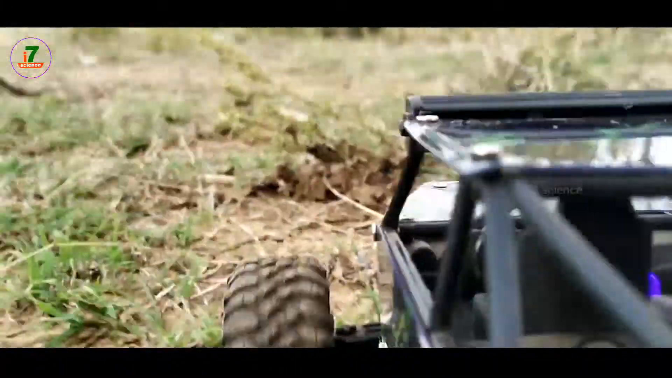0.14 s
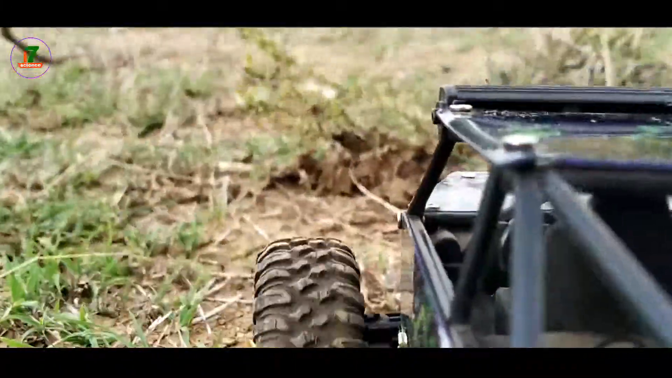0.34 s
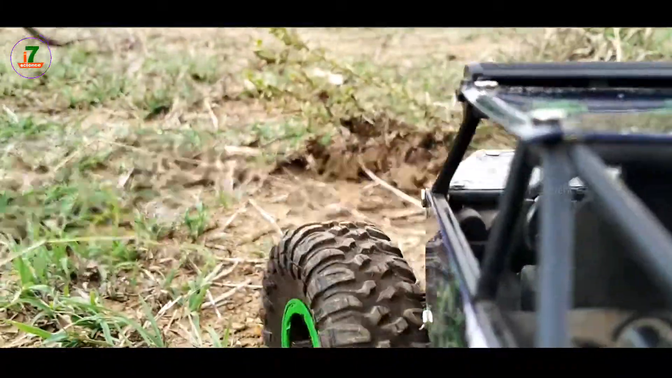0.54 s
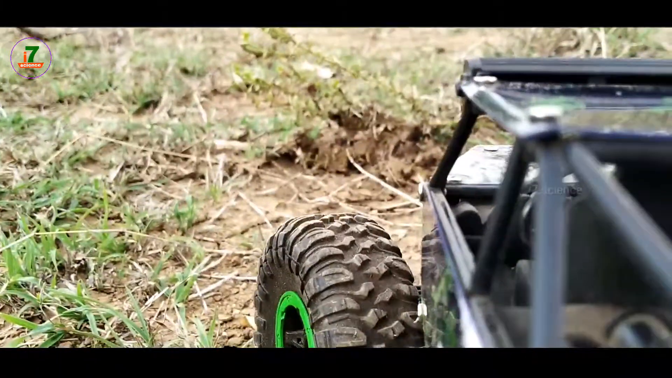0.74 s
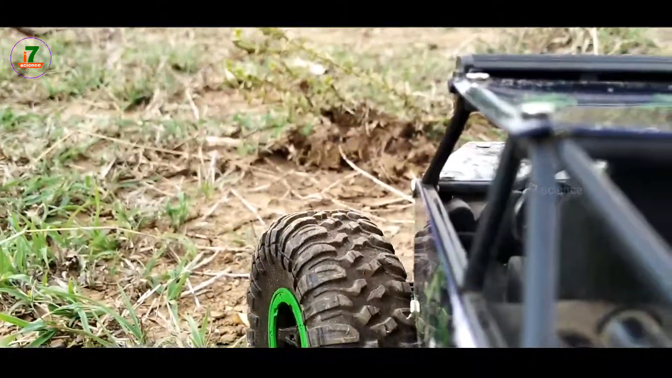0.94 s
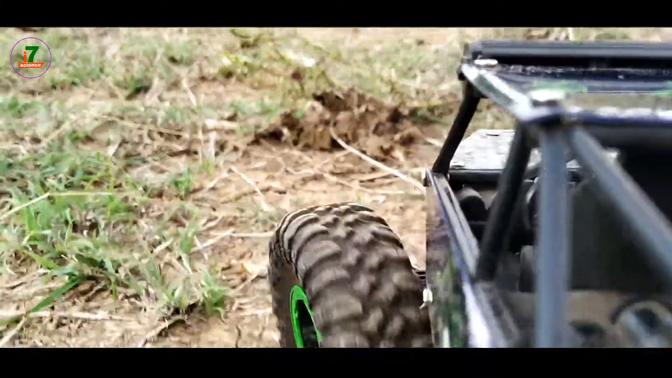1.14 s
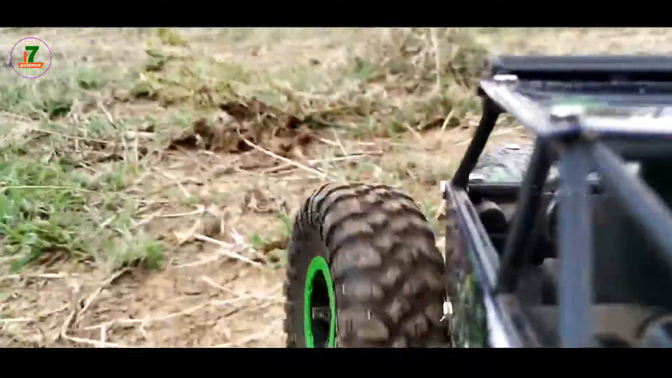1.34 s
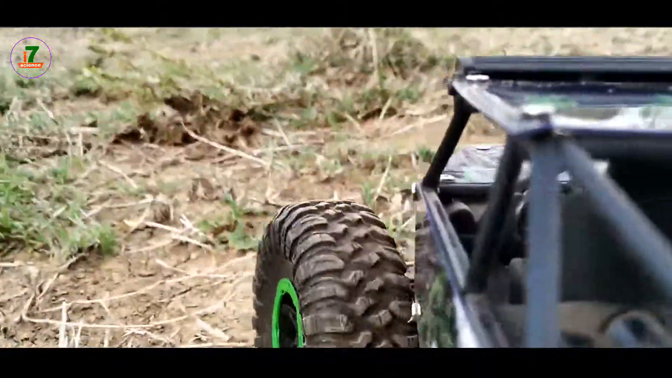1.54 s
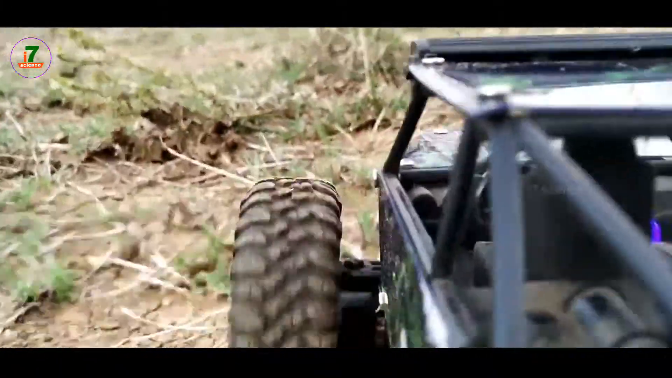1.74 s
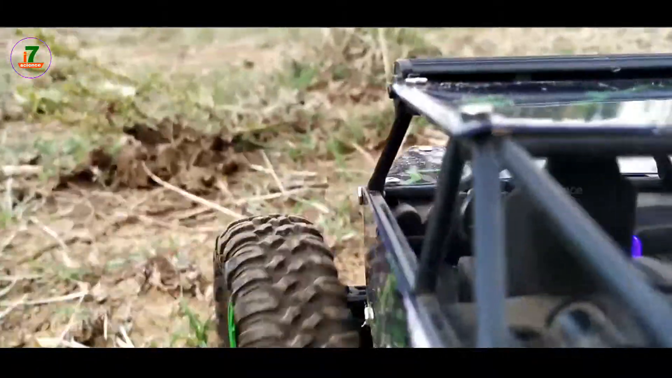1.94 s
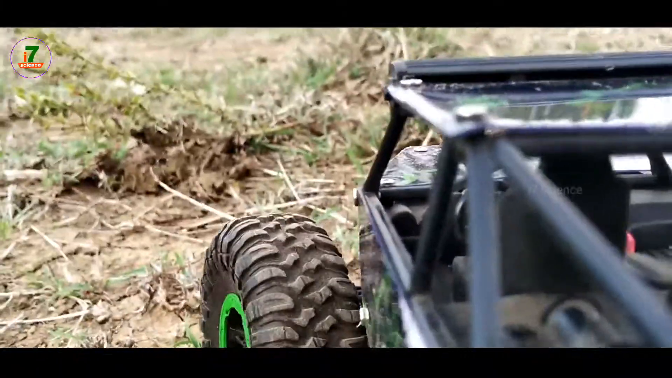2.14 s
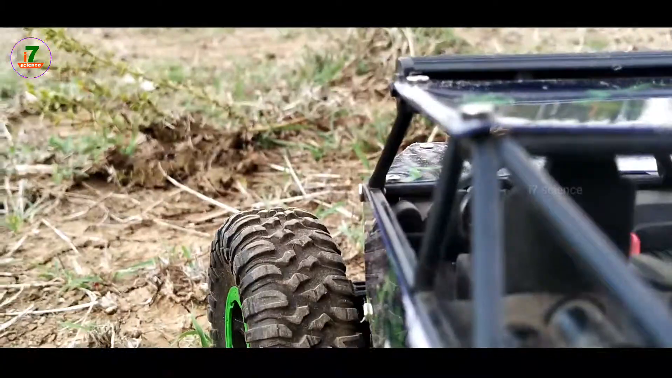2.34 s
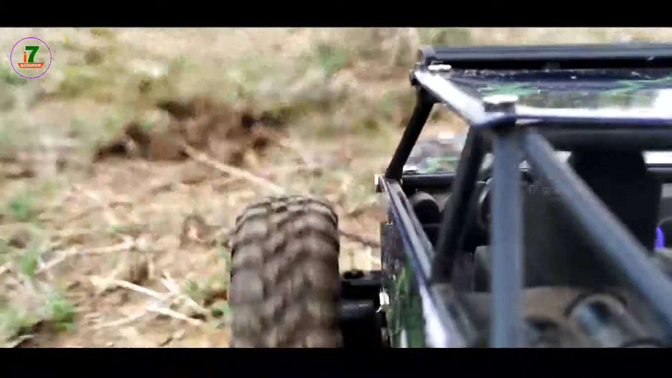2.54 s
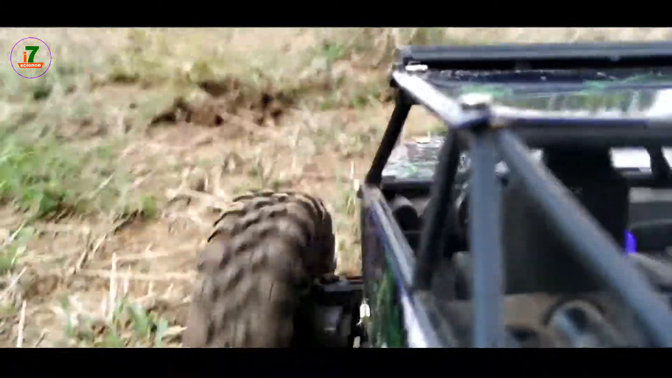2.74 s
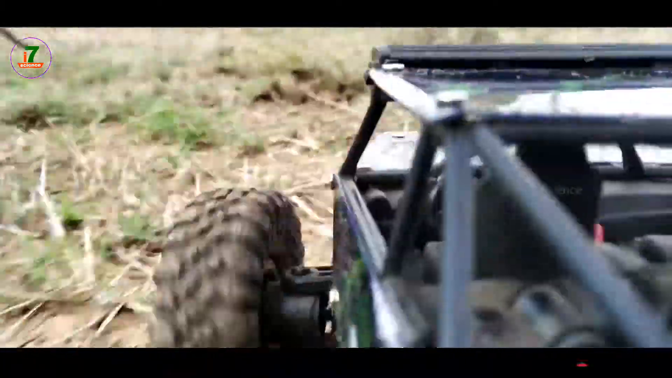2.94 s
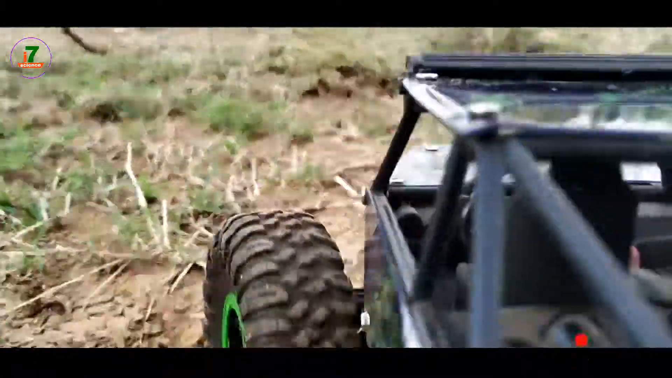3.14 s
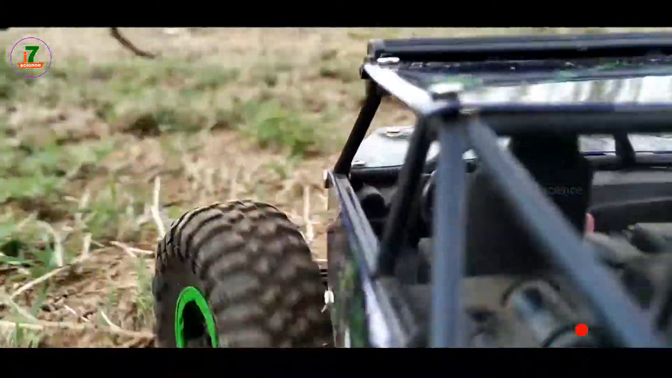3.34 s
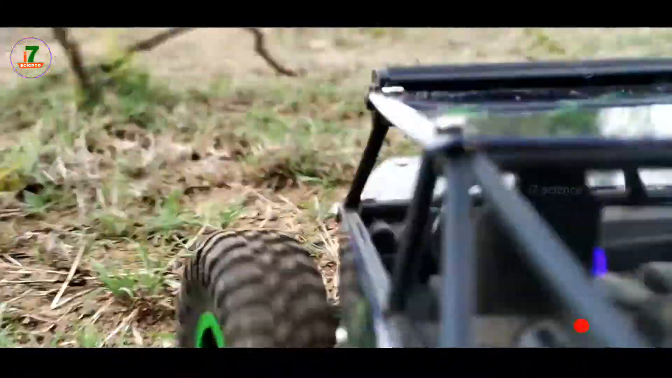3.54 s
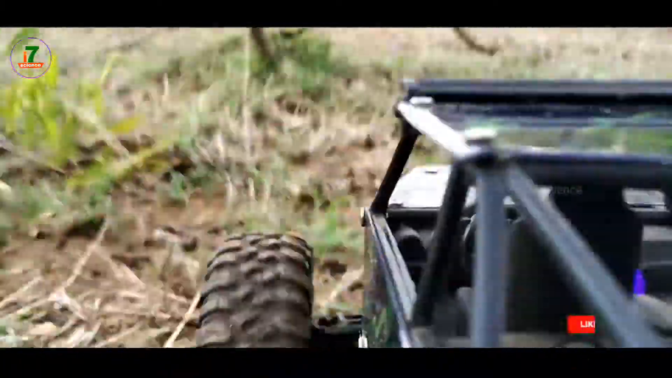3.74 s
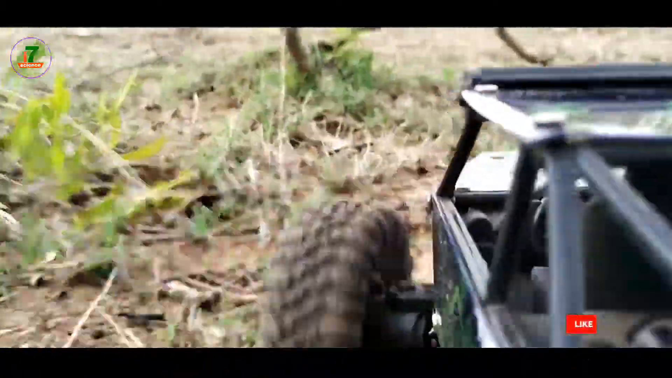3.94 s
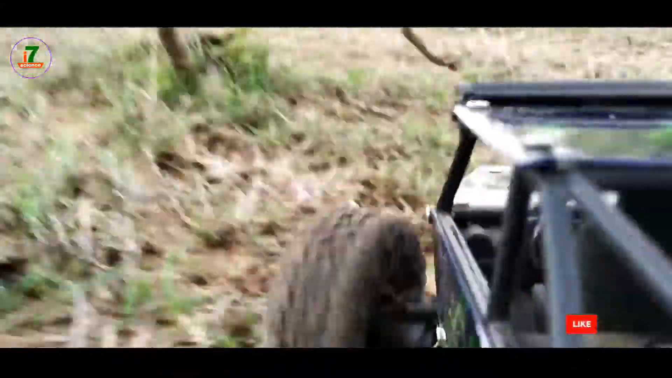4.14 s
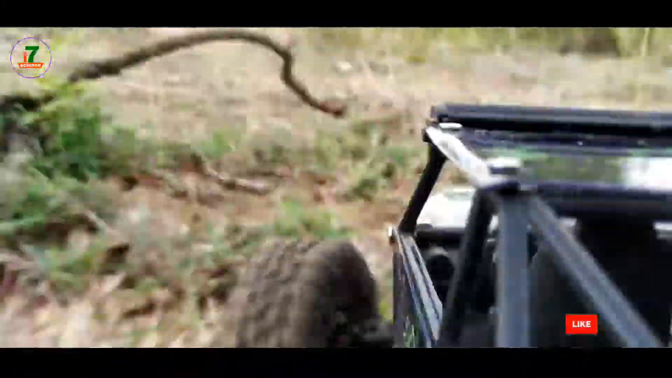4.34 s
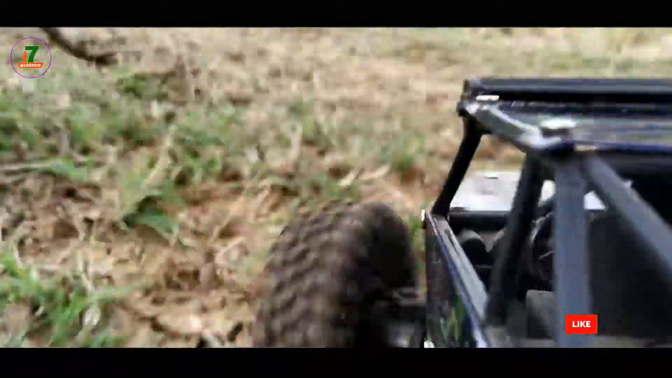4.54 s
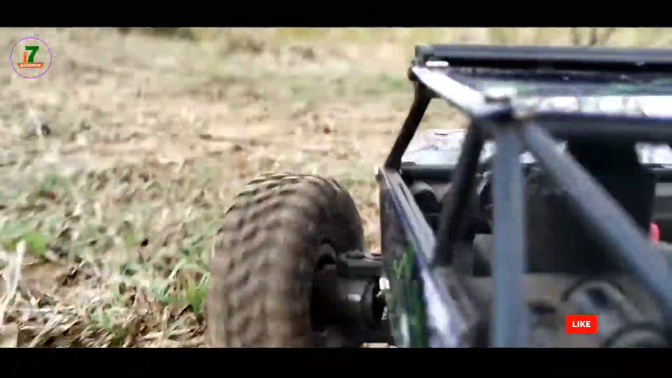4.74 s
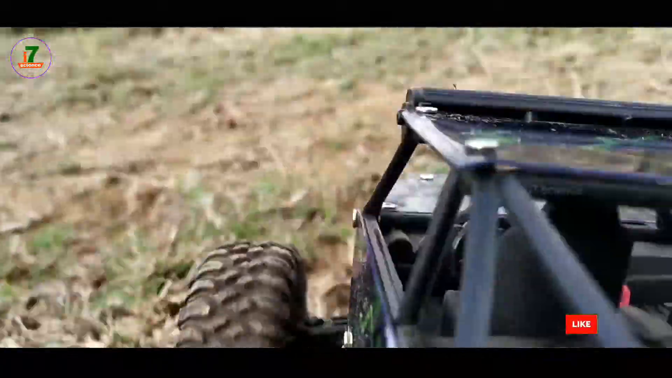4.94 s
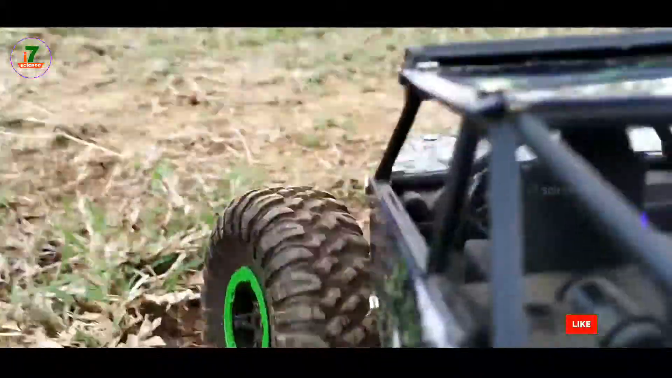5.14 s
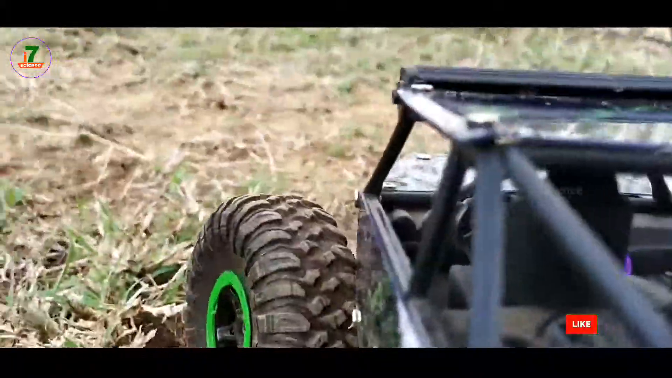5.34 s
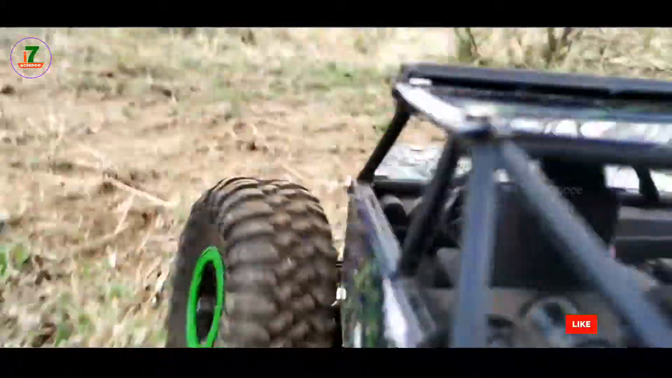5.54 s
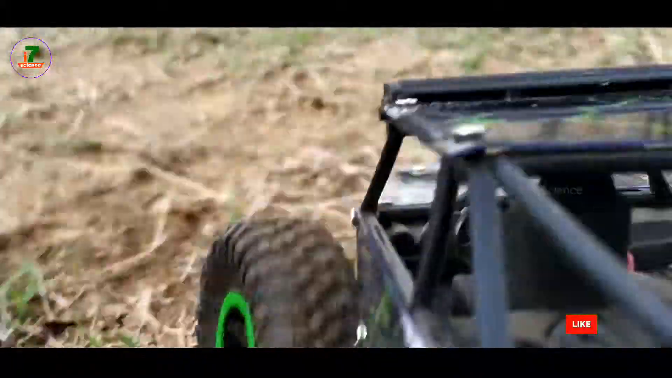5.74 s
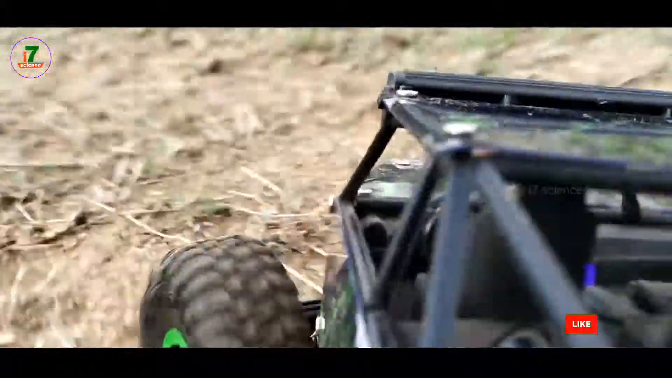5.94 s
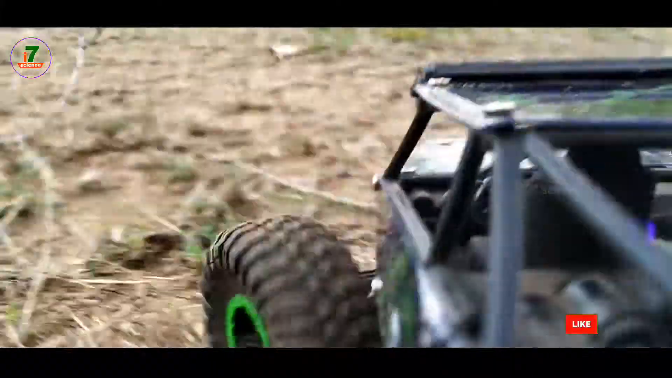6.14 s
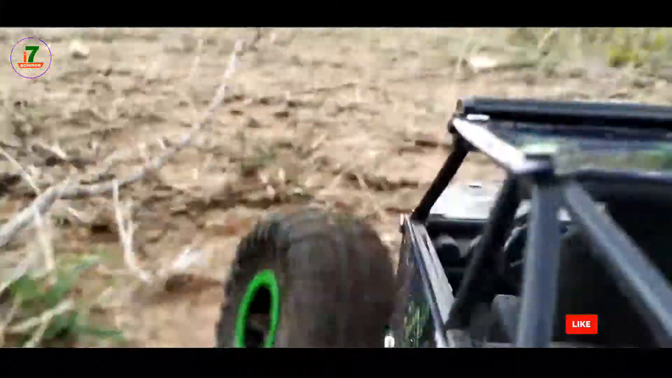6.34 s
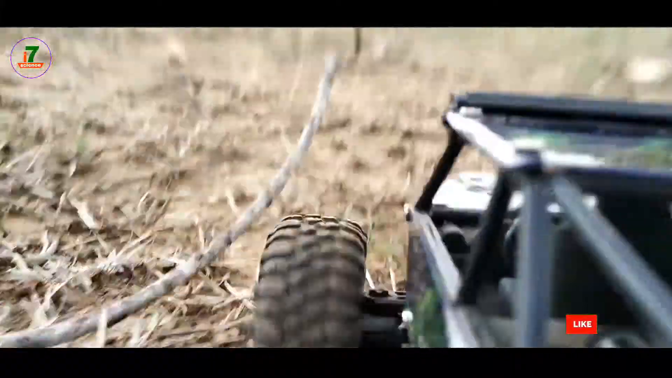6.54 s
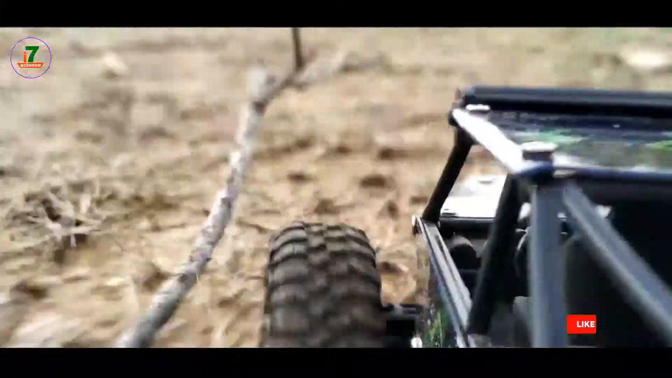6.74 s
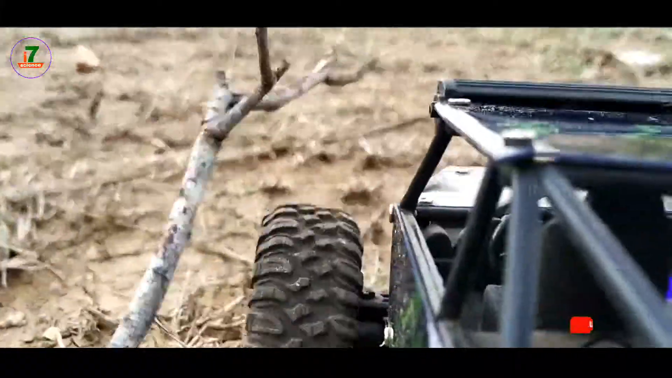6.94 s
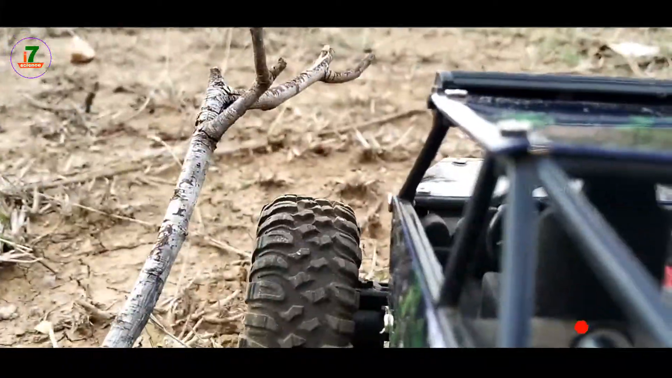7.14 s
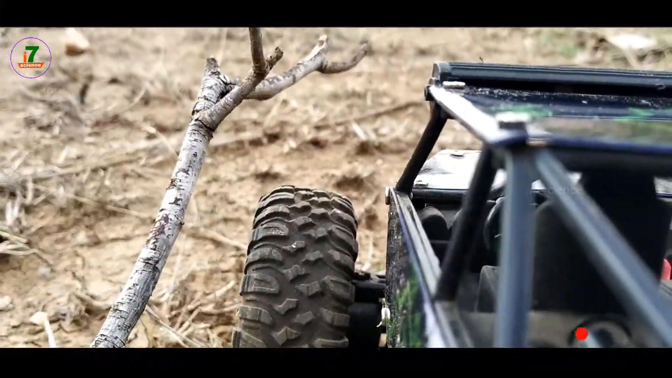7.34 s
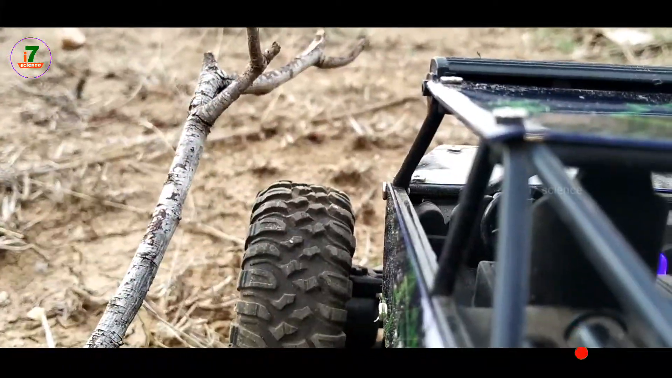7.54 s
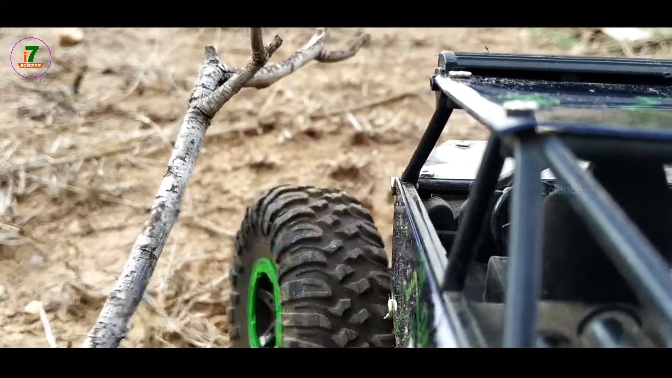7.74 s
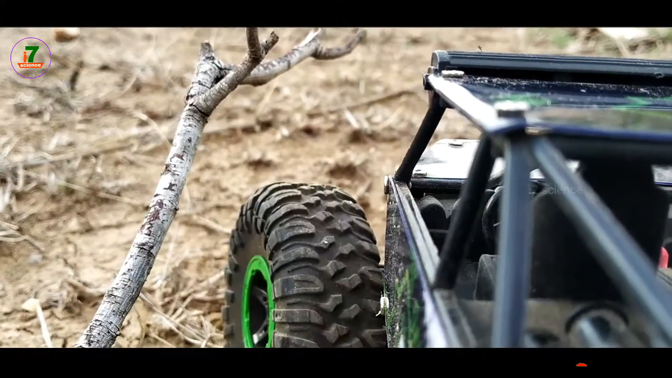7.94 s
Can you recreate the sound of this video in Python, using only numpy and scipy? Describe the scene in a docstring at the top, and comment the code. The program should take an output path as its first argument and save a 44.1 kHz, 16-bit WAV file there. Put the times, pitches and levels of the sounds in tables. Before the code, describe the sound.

Close, gritty gearbox whirring rises and falls with sharp ticks, low rumble and tyre growl, before quiet open air and a faint bird call.

```python
"""Plastic gears rasp at once, over a low rumble: a small electric off-road model truck just ahead of two ports.
The rasp is noise and random tooth strikes shaped by gearbox resonances; it surges with throttle and bumps.
Gliding partials squeal at tooth-mesh rates; noise thumps, drones and growls below; the chassis ticks and knocks.
A faint hum sounds near the first pause, and a steering motor, pulsed at a creeping rate, buzzes at full lock.
Late on, gliding tones make a falling bird call, near a faint separate tone, over quiet open air.
"""
import sys
import numpy as np
from scipy import signal
from scipy.fft import rfft, irfft, next_fast_len
from scipy.io import wavfile
from scipy.ndimage import uniform_filter1d, minimum_filter1d, map_coordinates

SR = 44100
rng = np.random.default_rng(int(sys.argv[2]) if len(sys.argv) > 2 else 0)


def dump(signal):
    """Clip the signal to [-1, 1] and save it as 16-bit WAV at the path in sys.argv[1]."""
    limited = np.clip(np.atleast_2d(signal).T, -1, 1)
    pcm = np.round(limited * 32767).astype(np.int16)
    wavfile.write(sys.argv[1], SR, pcm)


N = 352800

# Gear load, one curve for each pull of the throttle: [t/s, level/dB]
THROTTLE_PULLS = [
    [(0, -31), (.254, -38), (.454, -51), (.497, -60.5)],
    [(1.085, -36), (1.127, -29.5), (1.217, -33.5), (1.297, -28.5), (1.45, -37.5), (1.578, -39),
     (1.586, -51), (1.655, -57)],
    [(1.67, -34.5), (1.682, -33), (1.78, -28), (1.951, -37.5), (2.06, -30.5), (2.15, -40), (2.2, -34),
     (2.33, -62.5), (2.42, -61), (2.44, -74)],
    [(2.455, -39), (2.484, -29), (2.524, -31.5), (2.82, -26.5), (2.968, -33), (3.228, -35.5), (3.55, -31),
     (3.605, -31), (3.62, -36), (3.78, -35.5), (4.0, -33), (4.45, -31.5), (4.749, -31), (4.849, -33.5),
     (5.168, -33), (5.243, -43.5), (5.33, -47.5)],
    [(5.456, -32.5), (5.65, -31.5), (5.8, -33), (5.95, -33.5), (6.08, -32), (6.47, -31.5), (6.834, -36.5),
     (6.984, -51), (7.044, -44), (7.104, -46), (7.129, -67.5), (7.26, -70.5), (7.333, -71)],
]
# Gear load as the wheels swing to lock: [t/s, level/dB]
STEERING_SWINGS = [
    [(.499, -55.5), (.53, -39), (.618, -30.5), (.649, -42.5), (.735, -56.5)],
    [(7.703, -48), (7.807, -34), (7.902, -56.5), (7.925, -67.5)],
]
# Load added as a wheel climbs a bump: [t/s of the peak, level/dB]
LOAD_SURGES = [(0.021, -35.5), (.076, -40), (0.256, -39), (1.703, -38.5), (1.8, -33.5), (1.889, -33.5),
               (2.634, -31.5), (2.82, -29.5), (2.866, -38), (3.016, -38.5), (3.319, -36.5), (3.385, -38.5),
               (3.596, -37), (3.898, -39.5), (4.011, -29), (4.057, -35), (4.372, -28.5), (4.612, -36.5),
               (4.746, -37.5), (5.584, -35.5), (5.679, -39.5), (5.747, -30.5), (5.85, -24.5),
               (5.927, -30.5), (5.99, -35), (6.141, -28.5), (6.242, -28), (6.342, -30.5), (6.471, -36.5),
               (6.625, -40), (6.745, -38.5), (6.83, -41.5), (6.939, -39), (7.012, -41), (7.228, -58.5)]
# Broad spectrum of the rasp: [f/Hz, level/dB per Hz]
RASP_SPECTRUM = [(120, -27), (200, -12), (448, -15.5), (950, -0.5), (1710, -2.5), (3620, -2), (5840, -3.5),
                 (8270, -3), (10700, -6.5), (14900, -13.5), (16000, -17.5)]
# Gearbox resonances added to a flat response of 1: [f/Hz, width/Hz, level/dB]
GEARBOX_MODES = [(2300, 600, -3), (3630, 700, -4), (5900, 800, -1), (9000, 400, -3), (10600, 900, 1)]
# Gain of the low mids of the rasp over time: [t/s, level/dB]
RASP_BODY = [(3.4, 1), (4.2, -4), (5.9, -2.5), (6.6, 1.5)]
# Open-air noise spectrum: [f/Hz, level/dB per Hz]
AIR_SPECTRUM = [(200, -21), (305, -16.5), (420, -25), (1000, -35), (4000, -43), (16000, -46.5)]
# Rumble level over time, before the jolts: [t/s, level/dB]
RUMBLE_LEVEL = [(0, -37.5), (.5, -52.5), (.988, -60), (1.297, -40.5), (1.581, -50), (1.911, -44),
                (2.325, -57), (2.55, -44), (3.916, -43.5), (4.25, -41.5), (4.6, -40.5), (4.944, -42.5),
                (5.378, -56), (5.7, -43), (6.535, -37.5), (6.85, -44.5), (7.1, -58.5), (7.663, -73),
                (7.832, -58), (8, -67)]
# Rumble spectrum: [f/Hz, level/dB per Hz]
RUMBLE_SPECTRUM = [(12, -57.5), (20, -14), (38, 0), (64, 2.5), (140, -3.5), (264, -17), (400, -15),
                   (520, -26), (880, -120)]
# Tyre growl spectrum: [f/Hz, level/dB per Hz]
GROWL_SPECTRUM = [(120, -25), (250, -5), (500, 0.5), (900, 5), (1600, -8.5)]
# Tooth-mesh squeals, nominal values: [t/s, length/s, start f/Hz, end f/Hz, level/dB]
MESH_SQUEALS = [(.069, 0.021, 2325, 2580, -25.5), (1.115, 0.026, 968, 820, -33),
                (1.111, 0.03, 2587, 2710, -28), (1.148, 0.056, 1317, 1656, -31.5),
                (1.182, 0.02, 2380, 2380, -29), (1.228, 0.034, 2680, 2590, -28.5),
                (1.258, 0.028, 1557, 1236, -28.5), (1.277, 0.029, 1108, 946, -32),
                (1.286, 0.049, 2750, 2350, -28.5), (1.749, .054, 1480, 2210, -32.5),
                (1.774, 0.059, 2290, 2580, -33.5), (2.471, 0.046, 1357, 1194, -30.5),
                (2.55, 0.039, 1577, 2050, -32), (2.623, 0.032, 2790, 2470, -27.5),
                (2.666, 0.054, 3230, 3470, -32), (2.71, 0.043, 1876, 1930, -30.5),
                (2.867, 0.047, 2670, 2310, -32), (3.004, .017, 3480, 3840, -29),
                (3.282, 0.043, 1730, 2130, -27.5), (3.292, 0.032, 2800, 3590, -32.5),
                (3.36, 0.074, 1560, 1440, -40.5), (3.372, 0.082, 3080, 2750, -32.5),
                (3.46, .046, 1792, 2044, -29), (3.48, 0.04, 2030, 1830, -30),
                (3.585, 0.023, 3630, 4200, -29.5), (4.005, 0.025, 2440, 1940, -33),
                (4.045, 0.026, 3770, 2930, -30), (4.062, 0.027, 1980, 2170, -31),
                (4.122, 0.047, 3580, 3750, -29), (4.185, 0.031, 4040, 3080, -23.5),
                (4.27, 0.028, 2014, 2020, -34), (4.302, 0.067, 2255, 2410, -33),
                (4.357, 0.029, 2390, 1810, -39.5), (4.362, 0.029, 4300, 3430, -26.5),
                (4.426, 0.038, 2235, 2340, -30.5), (4.48, 0.083, 2310, 2010, -28.5),
                (4.6, 0.02, 2640, 2530, -29.5), (4.617, .024, 2053, 2020, -30.5),
                (4.745, 0.037, 2570, 2210, -30), (5.455, 0.037, 1390, 1460, -36.5),
                (5.49, 0.027, 950, 1070, -38), (5.553, 0.045, 1960, 2280, -34.5),
                (5.565, .03, 2980, 3410, -34.5), (5.633, 0.036, 3190, 2940, -30),
                (5.658, 0.026, 3060, 2320, -32.5), (5.67, 0.022, 3720, 3490, -27.5),
                (5.652, 0.026, 1480, 1150, -34.5), (5.745, 0.043, 3340, 2460, -34.5),
                (5.826, 0.042, 2358, 1515, -30), (5.85, 0.025, 4130, 2870, -26.5),
                (5.92, 0.08, 2253, 2035, -28.5), (6.024, 0.025, 2214, 2180, -28.5),
                (6.121, 0.042, 2835, 1880, -32), (6.13, 0.034, 5280, 3780, -26),
                (6.326, 0.041, 3100, 2500, -34), (6.46, 0.014, 3200, 3000, -27.5),
                (6.61, 0.044, 5600, 6300, -30)]
# Partials of a squeal: [multiple of the mesh rate, mean level/dB]
SQUEAL_PARTIALS = [(.5, -10), (1, -1.37), (3 / 2, -12), (2, -8.5), (2.7, -11)]
# Chassis ticks: [t/s, peak level/dB, centre f/Hz]
CHASSIS_TICKS = [(0.251, -22, 2800), (0.378, -25, 5100), (0.497, -28, 6200), (1.0853, -29, 2750),
                 (1.5424, -15, 9290), (1.5803, -12, 9700), (1.6062, -33, 3730), (2.181, -17, 5990),
                 (2.455, -34, 2600), (2.48, -15, 2620), (3.194, -28, 6100), (4.19, -12, 5500),
                 (5.3006, -38, 2644), (5.4584, -22, 3560), (6.133, -6, 10400), (6.739, -19.5, 6200),
                 (6.97, -25.5, 9500), (7.137, -48.5, 6300), (7.2128, -41.5, 3660), (7.2258, -43.5, 9600),
                 (7.2522, -38.5, 2100), (7.289, -41, 2370), (7.3082, -37.5, 1940), (7.353, -52.5, 4980),
                 (7.6556, -47, 4020), (7.703, -31, 5610)]
# Body knocks: [t/s, nominal level/dB, ring f/Hz]
BODY_KNOCKS = [(0.364, -29, 925), (2.809, -30, 1060), (3.472, -28, 1080), (4.37, -27, 358),
               (5.258, -42, 950), (5.849, -30, 930), (6.231, -33.5, 920), (6.825, -28, 684),
               (6.854, -34, 1030)]
# Harmonics of the faint hum: [multiple, mean level/dB]
HUM_HARMONICS = [(5, -64), (6, -69), (7, -66), (8, -76), (9, -77)]
# Steering motor held at lock: [start t/s, end t/s, first pulse rate/Hz, creep/(Hz per s), level/dB,
# loudest multiple, next loudest multiple, level of the loudest/dB]
LOCK_HOLDS = [(0.661, 1.105, 111.1, 3, -45, 15, 9, 1), (5.224, 5.483, 110, -6, -44.5, 12, 10, 0),
              (7.848, 8.052, 115.4, -28.5, -45.5, 9, 10, -5)]
# Orders of the pulse rate, unless among the two loudest: [multiple, mean level/dB]
MOTOR_ORDERS = [(6, -19), (8, -11), (9, -13), (10, -15), (11, -9), (12, -14), (13, -14), (14, -11),
                (15, -11), (19, -14)]
# Spectrum of the motor buzz: [f/Hz, level/dB per Hz]
BUZZ_SPECTRUM = [(350, -40), (700, -30), (1300, -16), (2600, -12), (3900, -14.5), (5000, -9), (7100, -7),
                 (8200, -9), (9300, -16), (10900, -9), (16000, -30)]
# A wheel drops: [t/s, peak level/dB]
WHEEL_THUMPS = [(2.79, -31), (4.35, -44), (4.67, -33), (4.849, -38), (5.841, -42), (6.21, -35.5),
                (6.481, -32.5), (6.815, -37)]
# A faint separate tone, then the bird notes: [mid-note level/dB, pitch curve of (t/s, f/Hz)]
BIRD_NOTES = [(-83, [(7.44, 1336), (7.6, 1530), (7.69, 1400)]), (-67, [(7.51, 3400), (7.525, 3250),
              (7.535, 2960), (7.556, 2910)]), (-59.5, [(7.549, 4500), (7.572, 4100), (7.595, 3990),
              (7.604, 3680), (7.62, 3420), (7.634, 2900)]), (-68, [(7.6, 5650), (7.618, 5200),
              (7.634, 4300)])]
# Likeness of the two ports: [f/Hz, left-right correlation]
PORT_LIKENESS = [(60, -.2), (250, 0.56), (660, 0.62), (1400, 0.34), (2800, 0.12), (3600, 0.036),
                 (5800, 0.63), (7300, 0.11), (9000, -0.29), (11800, 0.057), (14000, -0.36)]
# Level difference of the two ports: [f/Hz, left minus right level/dB]
PORT_LEAN = [(60, 0.5), (240, 0.5), (950, -1), (3770, -0.5), (15000, 2.5)]

# Treble gain: TREBLE_DB at a pull level of LOUD_DB; lower as a later pull takes up speed
TREBLE_DB, TREBLE_PER_DB, LOUD_DB = 3.5, 0.3, -32.5
DULL_DB, OPEN_S, SWING_TREBLE_DB = 8, 0.15, 7.5
SURGE_RISE_S, SURGE_FALL_S = 0.0094, 0.0098  # Gaussian spreads
FLEX = .025  # share by which each of two gearbox responses is shifted in frequency
AIR_DB, DRONE_DB = -67, -55.5
JOLT = 0.55  # how far the rumble follows quick swings of the load, dB per dB
GROWL_DB, GROWL_PER_DB, ROLLING_DB = -44.5, 1.55, -43.5  # growl at the rolling rumble level, and its growth
HUM_HZ, HUM_S = 49.3, (0.41, 1.04)  # mean fundamental; start and end
HOLD_FADE_S, LINES_DB = 0.026, -13.5
THUMP_HZ = 91  # before a random shift for each thump
TOP_HZ = 15900  # band limit


def amp(db):
    """Logarithmic level: the gain of a level in dB."""
    return 10 ** (np.asarray(db) / 20)


def unit(x):
    """Normalisation of power: x at rms 1."""
    return x / np.sqrt(np.mean(x ** 2) + 1e-20)


def along(points, hz):
    """Interpolation of (f/Hz, value) points on a logarithmic frequency axis."""
    f, v = np.transpose(points)
    return np.interp(np.log(hz + 1), np.log(f + 1), v)


def curves(rows):
    """Linear interpolation in time: one value per sample for each column after the time."""
    s, *cols = np.transpose(rows)
    return [np.interp(np.arange(N) / SR, s, c) for c in cols]


def strung(groups):
    """Concatenation of short dB curves, with a -100 dB floor between them."""
    rows = []
    for group in groups:
        rows += [(group[0][0] - .003, -100), *group, (group[-1][0] + .01, -100)]
    return curves(rows)[0]


def wobble(rate):
    """Slow random modulation: a smooth curve with rate knots per second."""
    knots = rng.standard_normal(int(N * rate / SR) + 4)
    return map_coordinates(knots, [np.arange(N) * rate / SR])


def filtered(x, response):
    """Linear filtering: the spectrum of x times a response of frequency."""
    m = next_fast_len(N + 8192)
    return irfft(rfft(x, m) * response(np.fft.rfftfreq(m, 1 / SR)), m)[..., :N]


def spread(pair, gain, alike=PORT_LIKENESS):
    """Partial coherence: two unrelated signals coloured and mixed to a stereo pair of rms 1."""
    def mid_side(hz):
        turn = np.arccos(np.clip(along(alike, hz), -1, 1)) / 2
        return gain(hz) * [np.cos(turn), np.sin(turn)]
    mid, side = filtered(pair, mid_side)
    return unit(np.array([mid + side, mid - side]))


def patchy(depth_db):
    """Time-frequency modulation: two noises share patches of random gain."""
    z = signal.stft(rng.standard_normal((2, N)), nperseg=256)[2]
    patches = uniform_filter1d(rng.standard_normal(z.shape[1:]), size=3, axis=0)
    patches = uniform_filter1d(patches, size=8, axis=1)
    return signal.istft(z * amp(depth_db * unit(patches)), nperseg=256)[1][:, :N]


def add(track, s, sound):
    """Superposition: mixes a short sound into a track at time s."""
    part = track[..., round(s * SR):][..., :sound.shape[-1]]
    part += sound[..., :part.shape[-1]]


def loading():
    """Amplitude follows load: throttle pulls, steering swings and a surge at each bump add up."""
    load = amp(strung(THROTTLE_PULLS)) + amp(strung(STEERING_SWINGS))
    u = np.arange(-SR // 20, SR // 10) / SR
    bump = np.exp(-.5 * (u / np.where(u < 0, SURGE_RISE_S, SURGE_FALL_S)) ** 2)
    peaks = np.zeros(N)
    for s, db in LOAD_SURGES:
        peaks[round(s * SR)] = amp(db)
    return load + np.abs(signal.fftconvolve(peaks, bump))[SR // 20:][:N]


def treble():
    """Brightness follows effort: treble gain in dB rises with the pull, and has its own value in a swing."""
    t, pull_db = np.arange(N) / SR, strung(THROTTLE_PULLS)
    starts = [pull[0][0] for pull in THROTTLE_PULLS[1:]]
    dull = sum(np.exp(-np.abs(t - start) / OPEN_S) * (t > start) for start in starts)
    pull_treble = TREBLE_DB + TREBLE_PER_DB * (pull_db - LOUD_DB) - DULL_DB * dull
    return np.where(strung(STEERING_SWINGS) > pull_db, SWING_TREBLE_DB, pull_treble)


def gears(load):
    """Friction and impact excite resonance: teeth rub and clatter unevenly into the gearbox."""
    strikes = (rng.random(N) < 300 / SR) * amp(np.minimum(6.7 * rng.exponential(1, N), 11))
    # each strike is a puff of noise of about half a millisecond
    clatter = signal.lfilter([1], [1, -.94], strikes) * rng.standard_normal((2, N))
    teeth = patchy(depth_db=3) + .52 * unit(clatter)
    # uneven tooth contact
    teeth *= amp(0.51 * wobble(11) + 0.94 * wobble(30) + 0.85 * wobble(110) + 0.28 * wobble(420))

    def box(f):
        modes = sum(amp(db) * w * w / (w * w + 4 * (f - c) ** 2) for c, w, db in GEARBOX_MODES)
        return amp(along(RASP_SPECTRUM, f)) * (1 + modes)

    # the casing flexes: the mix drifts between responses shifted up and down
    flex = np.pi / 4 * (1 + np.tanh(wobble(9)))
    raised = spread(teeth, lambda f: box(f * (1 - FLEX)))
    lowered = spread(teeth[::-1] * [[1], [-1]], lambda f: box(f * (1 + FLEX)))
    rasp = unit(np.cos(flex) * raised + np.sin(flex) * lowered)
    body = filtered(rasp, lambda f: 1 / (1 + (f / 1600) ** 6))
    rasp = rasp + (amp(curves(RASP_BODY)[0]) - 1) * body
    high = filtered(rasp, lambda f: 1 / (1 + (7000 / (f + 1)) ** 6))
    return load * (rasp - high + amp(treble()) * high)


def wind_and_jolts(load):
    """Pressure fluctuation at a port: wind and jolts give low noise that differs between the ports."""
    lumps = amp(1.5 * wobble(17) + 1.8 * np.array([wobble(11), wobble(11)]))
    swing = (load + 0.0029) / np.abs(uniform_filter1d(load + .003, size=SR // 5))  # against a 0.2 s mean
    thumping = np.clip(swing, .2, 4) ** JOLT * lumps * rng.standard_normal((2, N))
    low = spread(thumping, lambda f: amp(along(RUMBLE_SPECTRUM, f)), [(60, -0.38), (200, 0.29)])
    return amp(curves(RUMBLE_LEVEL)[0]) * low


def drone():
    """Narrow-band noise: a low steady drone around 58 Hz, nearly alike at both ports."""
    noise = rng.standard_normal((2, N))
    return amp(DRONE_DB) * spread(noise, lambda f: 1 / (1 + ((f - 58) / 12) ** 2), [(60, 0.94)])


def tyre_growl():
    """Rough contact radiates noise: the tyres growl over the dirt, growing faster than the rumble."""
    rough = amp(2.5 * wobble(12) + 2.5 * wobble(45)) * rng.standard_normal((2, N))
    growl = spread(rough, lambda f: amp(along(GROWL_SPECTRUM, f)))
    return amp(GROWL_DB + GROWL_PER_DB * (curves(RUMBLE_LEVEL)[0] - ROLLING_DB)) * growl


def open_air():
    """Diffuse background noise: quiet open air, little alike at the ports in the treble."""
    noise = patchy(depth_db=2.5)
    return amp(AIR_DB) * spread(noise, lambda f: amp(along(AIR_SPECTRUM, f)), [(300, 0.64), (1200, 0.065)])


def squeals(load):
    """Periodic tooth meshing: a gear pair sings briefly and brokenly at its gliding mesh rate."""
    out = np.zeros((2, N))
    # many faint squeals ride on the rasp: t/s, length/s, start f/Hz, glide ratio
    faint = rng.random((640, 4)) * [7.9, .015, 3800, .3] + [0, .007, 850, .83]
    middle = ((faint[:, 0] + faint[:, 1] / 2) * SR).astype(int)
    faint_db = 20 * np.log10(minimum_filter1d(load, size=SR // 20)[middle]) - 5
    small = [(s, length, hz, hz * glide, db) for (s, length, hz, glide), db in zip(faint, faint_db)]
    for s, length, hz0, hz1, db in list(MESH_SQUEALS) + small:
        u = np.linspace(-.15, 1.15, int(1.3 * length * SR))  # the fades overrun both ends
        shake = uniform_filter1d(rng.standard_normal((7, len(u))), size=100) * 10
        hz = (hz0 + (hz1 - hz0) * u) * (1 + .017 * shake[0])
        turn = 2 * np.pi * np.cumsum(hz) / SR
        shift = np.array([[0], [1.1]]) * rng.standard_normal()  # different paths to the two ports
        tone = sum(amp(level + 3.16 * w) * np.sin(k * turn + shift)
                   for (k, level), w in zip(SQUEAL_PARTIALS, shake[1:]))
        envelope = amp(db - 1 + 3 * shake[6]) * np.hanning(len(u)) ** .6
        add(out, max(s - .15 * length, 0), envelope * tone)
    return out


def ticks():
    """Impulsive excitation: dry cracks over a broad band, each with a fast decay and a weak tail."""
    out, t = np.zeros((2, N)), np.arange(SR // 16) / SR
    for s, db, hz in CHASSIS_TICKS:
        decay = amp(-60 * t / 0.0088) + 0.065 * amp(-60 * t / 0.034)
        crack = rng.standard_normal((2, len(t))) * decay
        crack = signal.lfilter(*signal.iirpeak(hz, 1.4, SR), crack)
        add(out, s, amp(db) * crack / np.abs(crack).max())
    return out


def knocks():
    """Damped modal vibration: a dull, short ring of three shell modes with the thud of the wheel."""
    out, t = np.zeros((2, N)), np.arange(SR // 16) / SR
    for s, db, hz in BODY_KNOCKS:
        ring = sum(g * np.sin(2 * np.pi * k * hz * t) for k, g in [(1, 1), (.7, 0.66), (0.447, 0.58)])
        thud = amp(db - 4.5 - 60 * t / 0.062) * np.sin(2 * np.pi * 110 * t)
        add(out, s, thud * np.array([[1], [.3]]))
        envelope = amp(db + 5.0 - 60 * t / 0.024) * (1 - np.exp(-t / 0.0016))
        add(out, s, envelope * ring * amp([[1.2], [-1.2]]))
    return out


def hum():
    """Harmonic series: upper harmonics of a slightly unsteady low fundamental make a faint hum."""
    t = np.arange(N) / SR
    swell = np.clip(np.minimum(t - HUM_S[0], HUM_S[1] - t) / 0.056, 0, 1)
    out = np.zeros(N)
    for k, db in HUM_HARMONICS:
        level = amp(db + 2 * wobble(7.8))
        cycles = np.cumsum(HUM_HZ + 0.39 * wobble(14.0)) / SR
        out += level * np.sin(2 * np.pi * k * cycles)
    return swell * out


def steering():
    """Periodic forcing: the stalled motor is pulsed at a slowly creeping rate, clear middle orders in a buzz."""
    t = np.arange(N) / SR
    nearest = np.argmin([abs(t - (a + b) / 2) for a, b, *_ in LOCK_HOLDS], axis=0)
    start_s, end_s, rate, creep, db, lead, second, lead_db = np.array(LOCK_HOLDS)[nearest].T
    gain = amp(db) * np.clip(np.minimum(t - start_s, end_s - t) / HOLD_FADE_S, 0, 1)
    hz = rate + creep * np.clip(t - start_s, 0, end_s - start_s)
    turn = np.cumsum(hz * (1 + .0015 * wobble(18))) / SR  # in cycles
    start = rng.uniform(0, 2 * np.pi, (len(MOTOR_ORDERS), 1, 1)) + np.array([[0], [.8]])
    lines = np.zeros((2, N))
    for (k, level), phase in zip(MOTOR_ORDERS, start):
        ranks = [np.round(lead) == k, np.round(second) == k]
        line_db = np.select(ranks, [lead_db, lead_db - 4], level) + 1.8 * wobble(14)
        lines += amp(line_db) * np.sin(2 * np.pi * k * turn + phase)
    pulses = np.diff(np.floor(turn), prepend=0) * amp(1.0 * rng.standard_normal(N))
    # many modes of the housing
    ring = rng.standard_normal((2, 900)) * np.exp(-np.arange(900) / SR / 0.0032)
    buzz = unit(signal.fftconvolve(pulses[None], ring, axes=1)[:, :N]) + 1.1 * patchy(depth_db=1.5)
    buzz = spread(buzz, lambda f: amp(along(BUZZ_SPECTRUM, f)), [(100, 0.28)])
    return gain * (buzz + amp(LINES_DB) * unit(lines))


def thumps():
    """Low-frequency transient: each wheel drop is a soft push, stronger at the left port."""
    out, t = np.zeros((2, N)), np.arange(SR // 16) / SR
    for s, db in WHEEL_THUMPS:
        push = np.hanning(len(t)) * np.sin(2 * np.pi * THUMP_HZ * t * rng.uniform(0.78, 1.25))
        add(out, s, amp(db) * push * np.array([[1], [.3]]))
    return out


def bird():
    """Frequency modulation: tones quiver in a falling call; a faint lower tone rises, then dips."""
    out = np.zeros((2, N))
    for db, pitch in BIRD_NOTES:
        s, hz = np.transpose(pitch)
        length = s[-1] - s[0]
        u = np.linspace(-1, 1, int(length * SR))
        quiver = uniform_filter1d(rng.standard_normal((2, len(u))), size=200) * 14
        glide = np.interp(u, 2 * (s - s[0]) / length - 1, hz)
        turn = 2 * np.pi * np.cumsum(glide * (1 + 0.0063 * quiver[0])) / SR
        envelope = amp(db - 3 * u + 1.4 * quiver[1]) * (1 - u * u) ** .5
        tone = np.sin(turn) + amp(-18) * np.sin(turn / 2)
        add(out, s[0], (envelope * tone)[None])
    return out


def scene():
    """Superposition of all sources at the two ports."""
    load = loading()
    out = gears(load) + wind_and_jolts(load) + drone() + tyre_growl() + open_air()
    out += squeals(load) + ticks() + knocks() + hum()
    return out + steering() + thumps() + bird()


def record(dry):
    """Band limiting: the ports lean by frequency, with a bass roll-off near 40 Hz and a sharp upper limit."""
    def response(hz):
        lean = amp(np.array([[.5], [-.5]]) * along(PORT_LEAN, hz))
        return lean * (hz < TOP_HZ) / (1 + (40 / (hz + 1)) ** 6)
    return filtered(dry, response)


dry = scene()
out = record(dry)
dump(out)
```